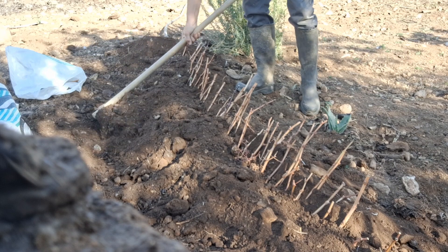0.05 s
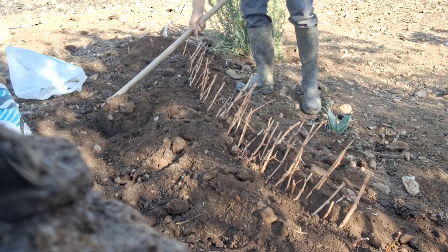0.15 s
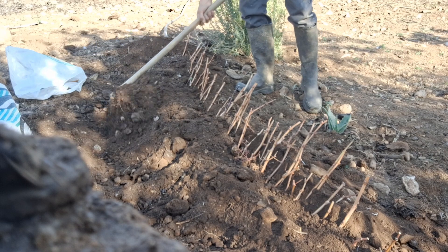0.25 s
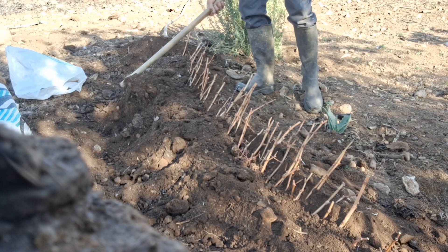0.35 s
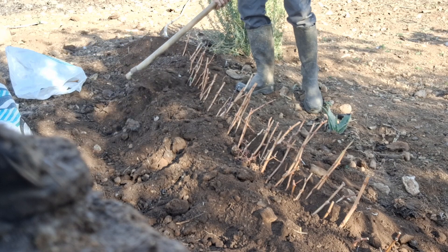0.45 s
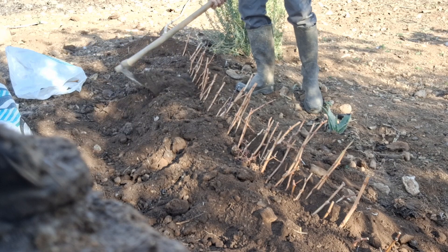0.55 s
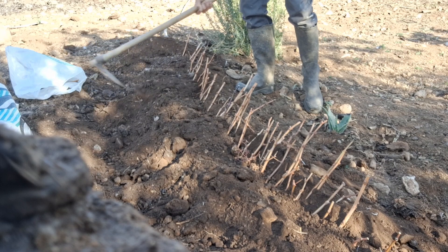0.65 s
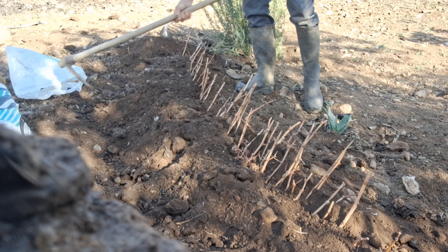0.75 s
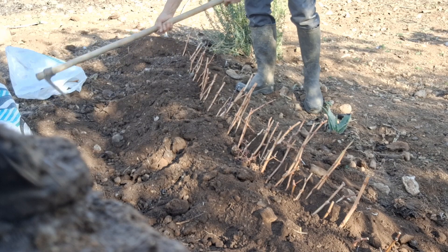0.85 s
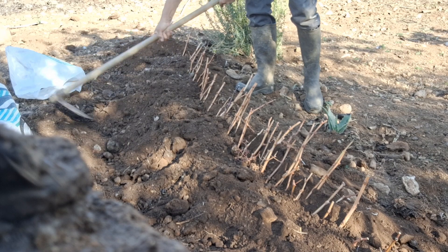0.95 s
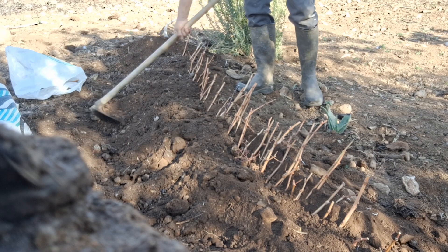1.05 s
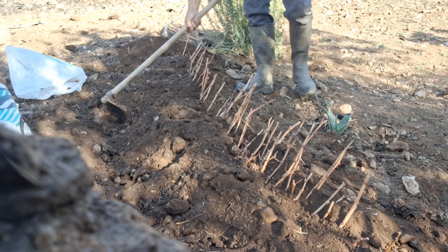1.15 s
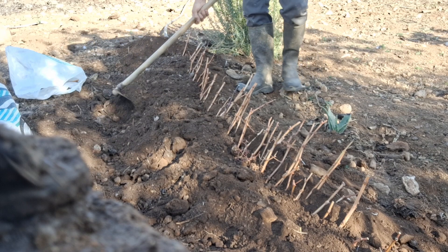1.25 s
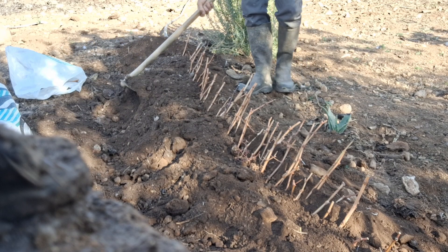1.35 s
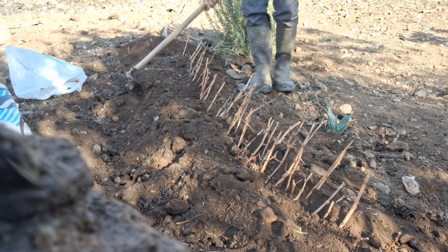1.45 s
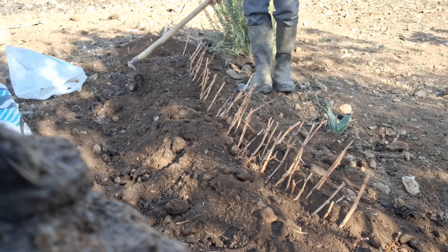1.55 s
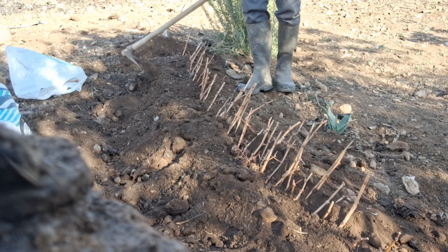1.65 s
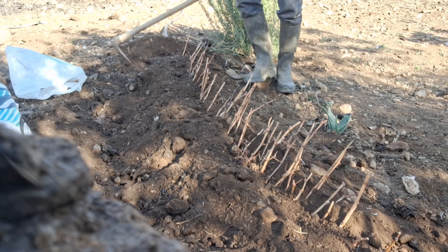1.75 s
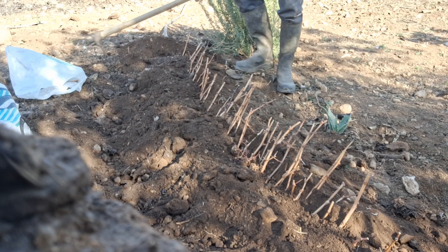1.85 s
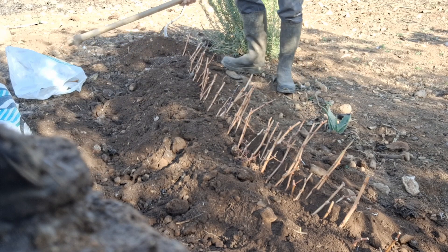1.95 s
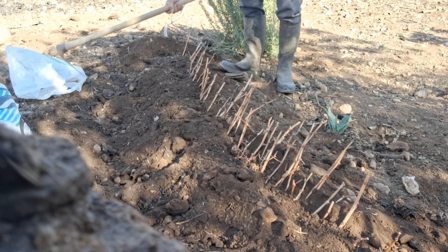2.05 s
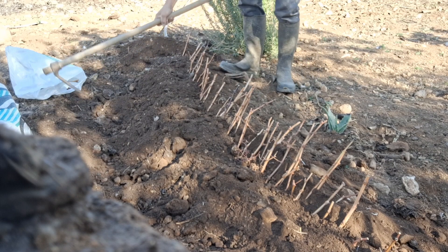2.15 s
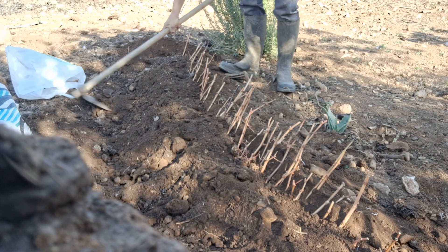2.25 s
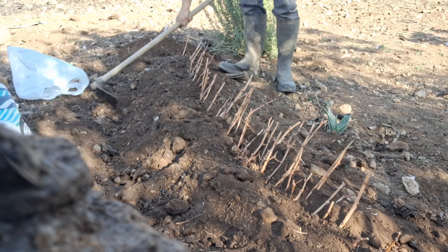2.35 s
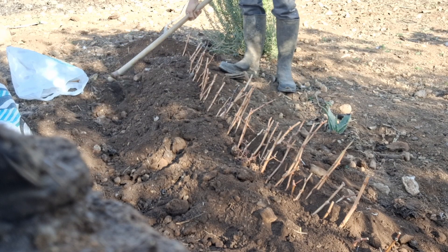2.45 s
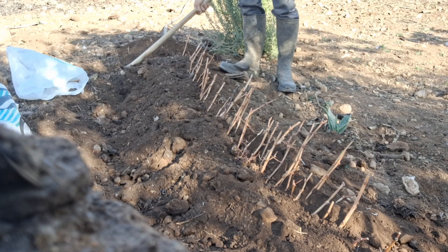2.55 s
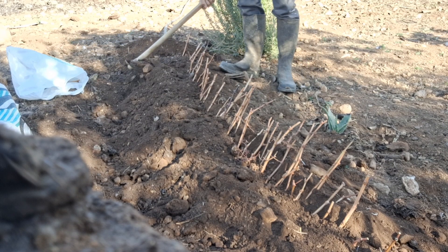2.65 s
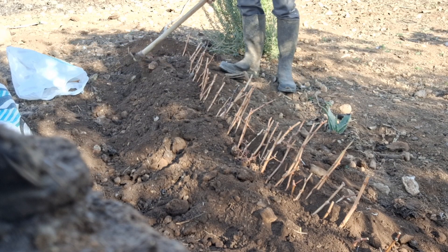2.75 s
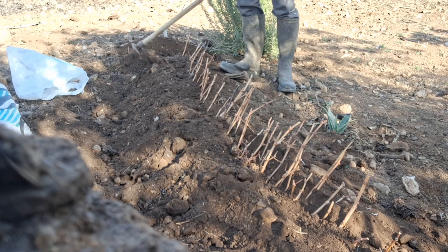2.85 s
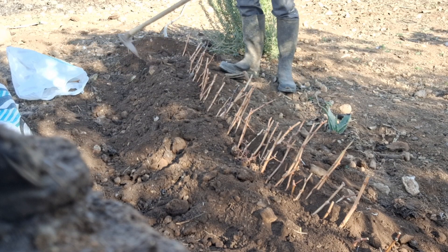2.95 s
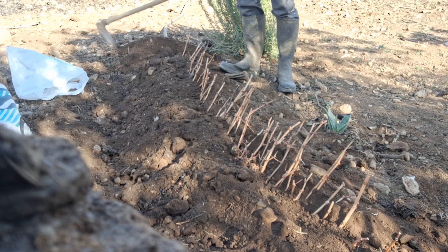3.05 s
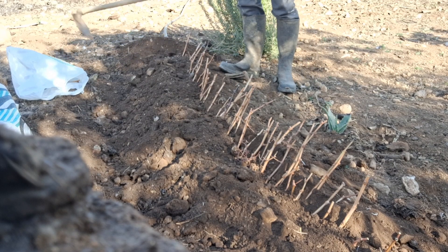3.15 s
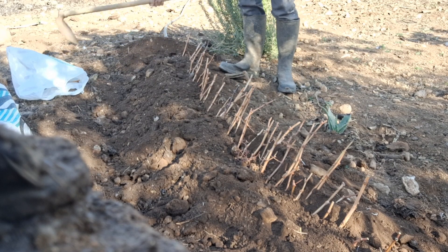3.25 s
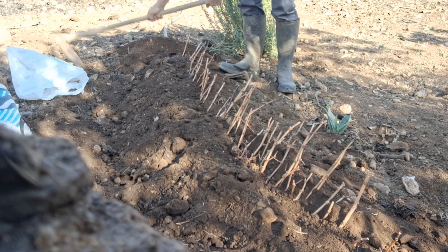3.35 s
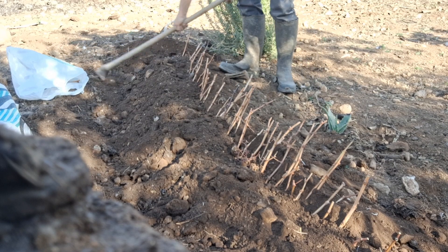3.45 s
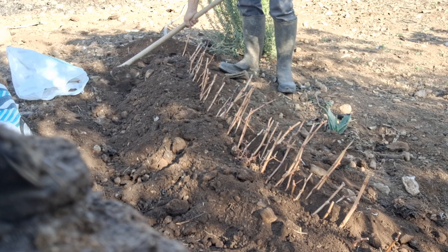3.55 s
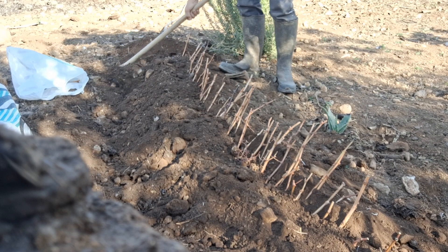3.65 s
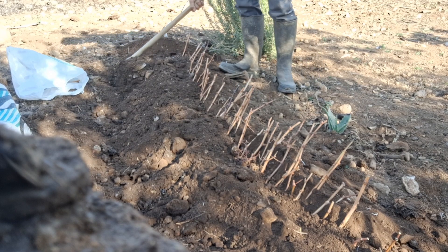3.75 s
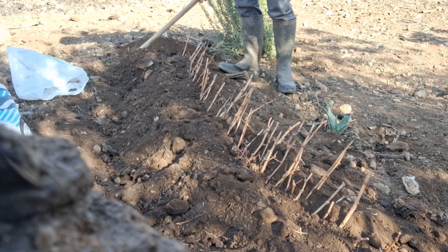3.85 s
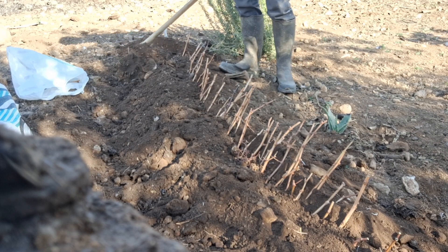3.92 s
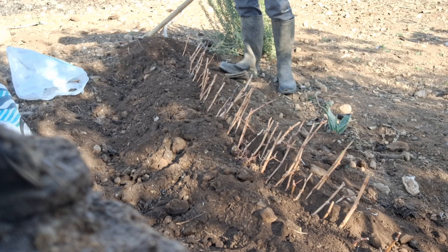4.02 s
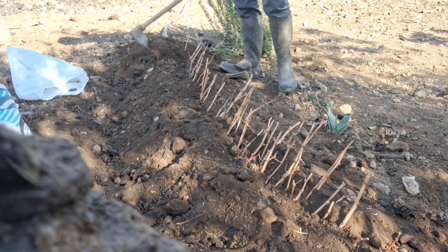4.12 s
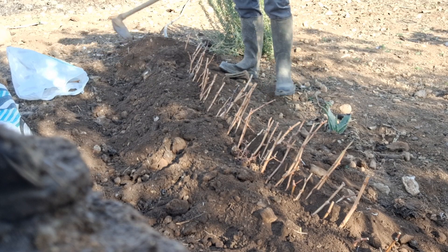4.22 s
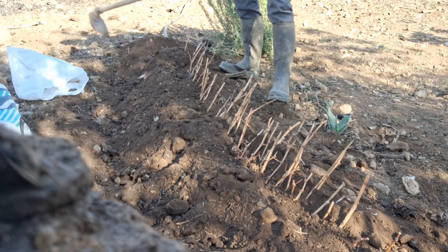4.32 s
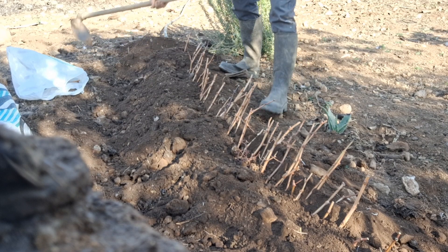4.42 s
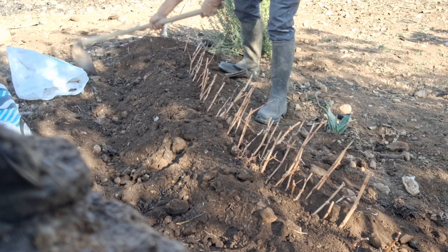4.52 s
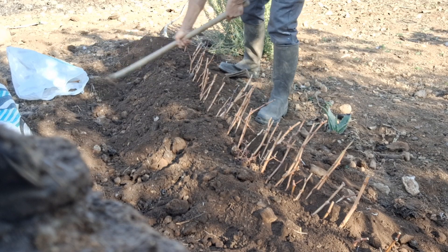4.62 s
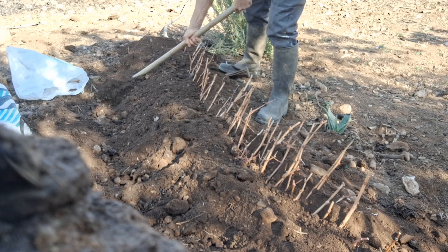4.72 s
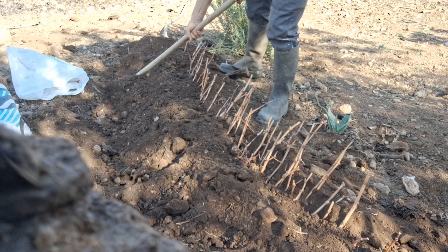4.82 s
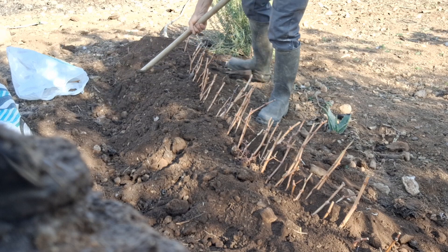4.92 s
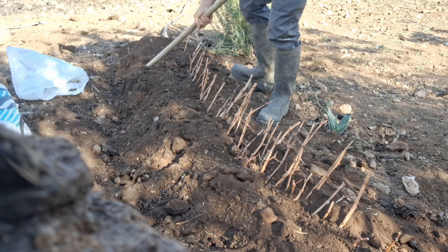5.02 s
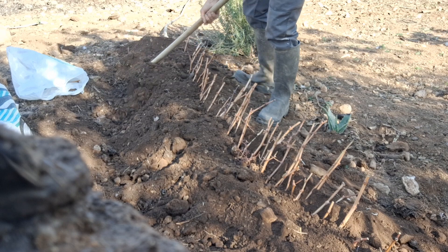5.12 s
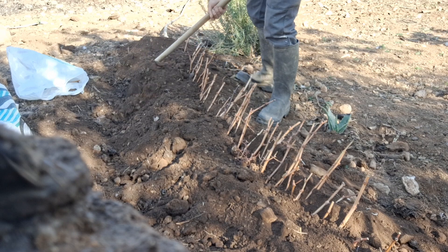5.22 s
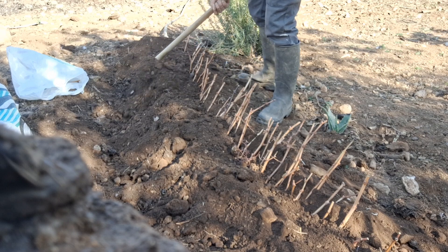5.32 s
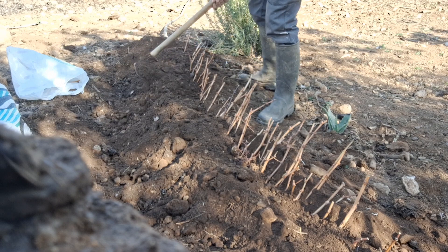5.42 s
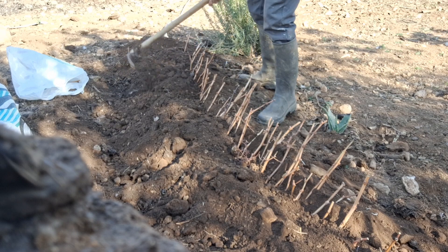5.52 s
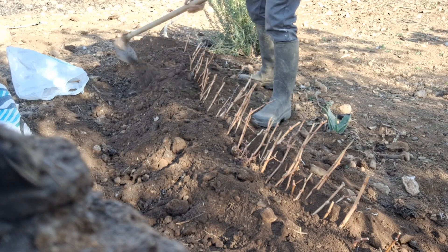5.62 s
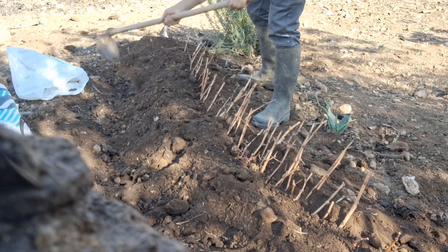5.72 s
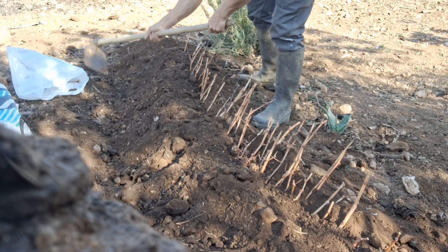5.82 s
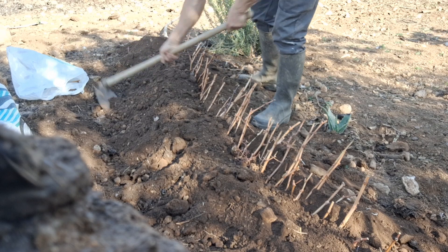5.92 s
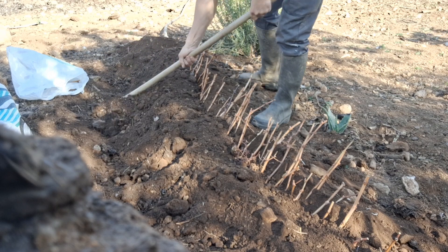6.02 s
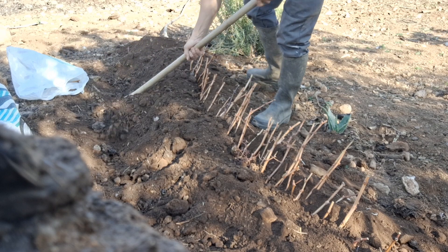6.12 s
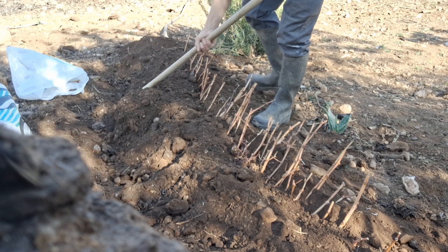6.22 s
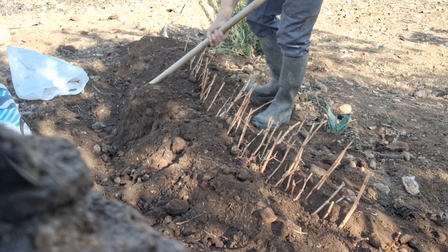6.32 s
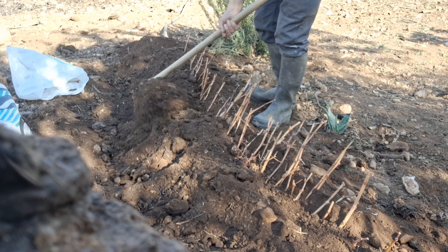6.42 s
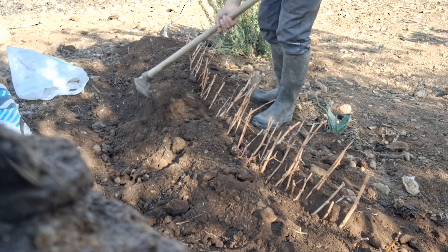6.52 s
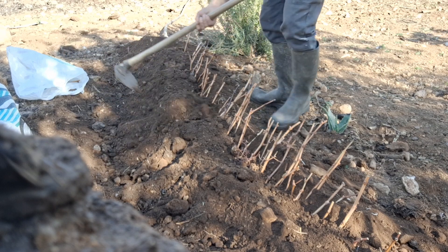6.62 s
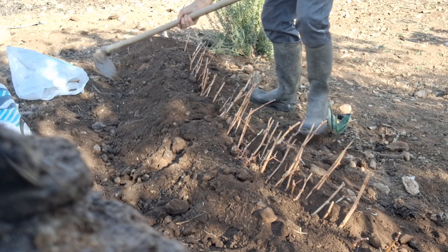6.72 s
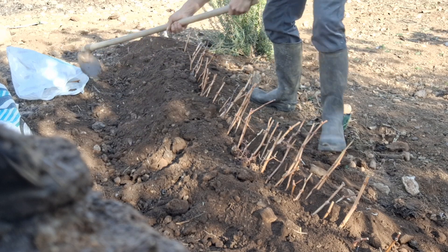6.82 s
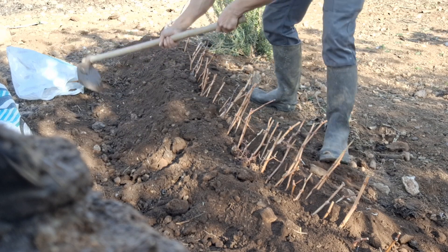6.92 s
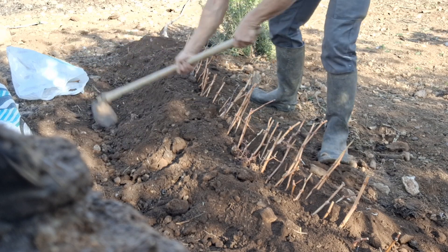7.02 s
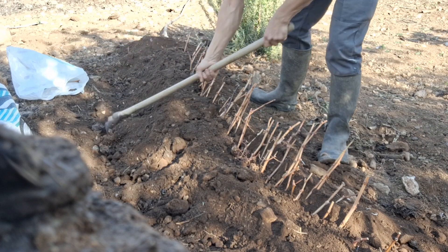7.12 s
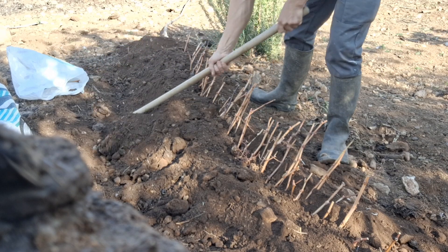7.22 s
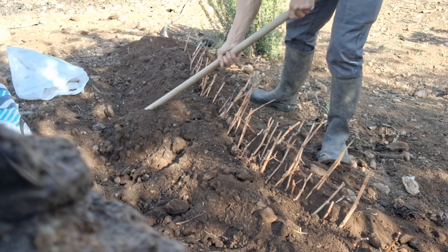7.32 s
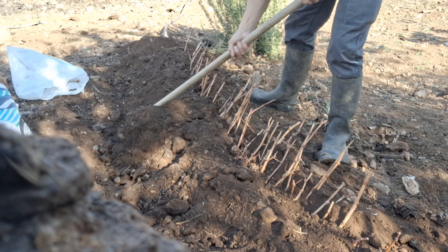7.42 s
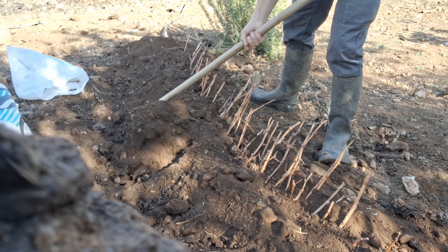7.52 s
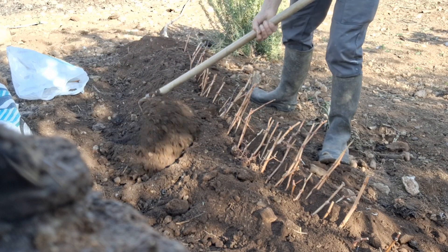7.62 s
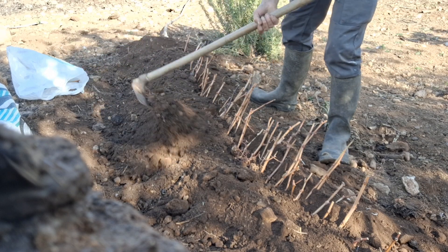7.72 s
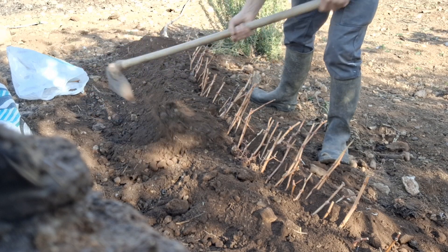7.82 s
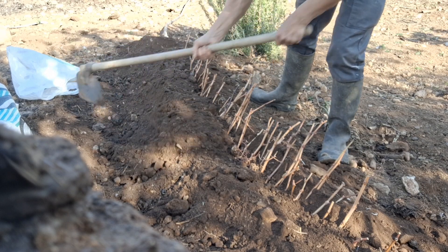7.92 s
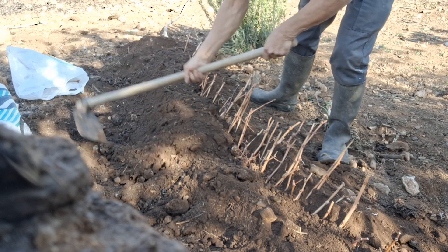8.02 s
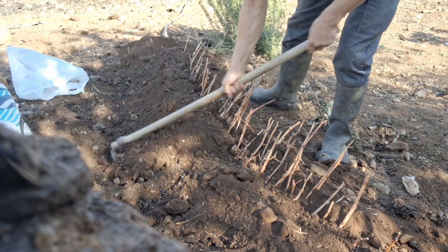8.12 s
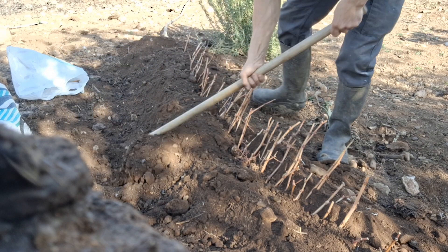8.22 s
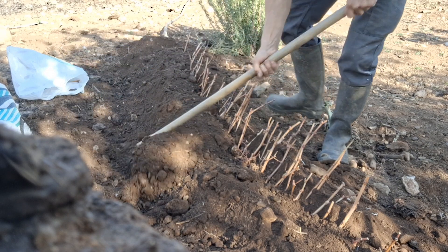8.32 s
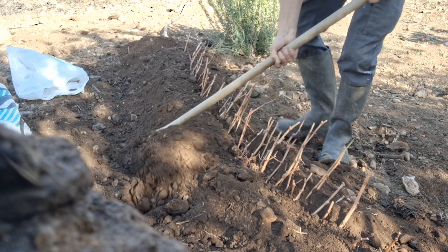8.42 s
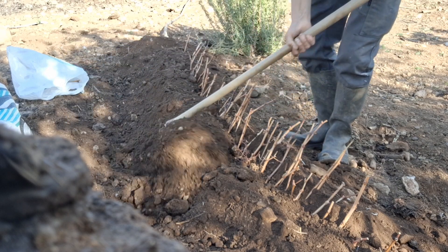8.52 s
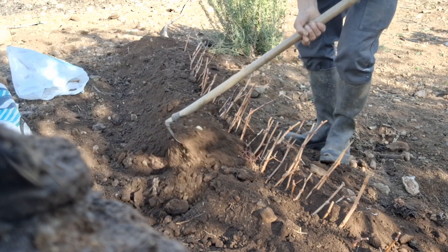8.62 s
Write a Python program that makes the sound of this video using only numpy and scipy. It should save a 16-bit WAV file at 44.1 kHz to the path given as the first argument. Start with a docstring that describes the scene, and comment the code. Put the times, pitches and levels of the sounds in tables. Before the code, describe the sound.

Steady hoeing in an open field: dull thuds, gritty scrapes and stones clacking on steel, with shuffling boots and rustling stalks.

```python
"""In an open field, a hoe chops into dry stony soil about once a second and pulls earth over a trench. Each
stroke is an impact: the ground thuds, grit scrapes along the steel, and stones clack against the blade and
excite its modes. Between strokes clods drop, boots shuffle and dry stalks rustle. Behind the work lie a low
distant rumble, small birds, a far-off rooster and other distant animals."""
import sys
import numpy as np
from scipy import signal
from scipy.fft import rfft, irfft, next_fast_len
from scipy.io import wavfile

SR = 44100
rng = np.random.default_rng(int(sys.argv[2]) if len(sys.argv) > 2 else 0)


def inscribe(sig):
    """Save sig as 16-bit PCM at rate SR to the path in sys.argv[1].

    A 1-D sig is mono; a 2-D sig holds one channel per row.
    Samples are clipped to [-1, 1] before scaling.
    """
    pcm = np.round(np.clip(np.atleast_2d(sig).T, -1, 1) * 32767)
    wavfile.write(sys.argv[1], SR, pcm.astype(np.int16))


N = 382347
SHORT = 8192  # samples in a brief event
TIME = np.arange(N) / SR

# spectra of open air, dry leaves, sliding earth, ground, grit and stone on steel: (f/Hz, level/dB)
AIR_SPECTRUM = [(20, -30), (35, -10), (58, 4), (125, -6), (250, -26), (450, -34), (4000, -41),
                (7200, -37.5), (8600, -45), (16000, -45)]
LEAF_SPECTRUM = [(1400, -14), (3500, -4), (7000, 8.5), (8700, -7.5), (16000, -4)]
SCUFF_SPECTRUM = [(80, -16.5), (250, 5.5), (1300, -2), (3000, -9), (7000, -11.5), (16000, -65)]
THUD_SPECTRUM = [(25, -19.5), (55, -3), (110, 4), (200, -4), (400, -12.5), (2000, -43)]
GRIT_SPECTRUM = [(100, -11.5), (450, -3.5), (950, -1.5), (3200, -3.5), (5000, 1), (7000, -1.5),
                 (8500, -19.5), (16000, -21)]
CLACK_SPECTRUM = [(100, -14), (700, -11.5), (1100, -3.5), (5000, -0.5), (7000, -3.5), (8500, -21.5),
                  (16000, -25.5)]
# spectrum of a soft lump landing: (multiple of its pitch, level/dB)
LUMP_SPECTRUM = [(.3, -4), (1, 0), (2, -8), (3.5, -25), (12, -44)]
# far-off animal calls: (t/s, duration/s, starting f/Hz, level/dB)
ANIMAL_CALLS = [(.53, .42, 1940, -73), (1.266, 0.22, 3030, -68), (4.058, 0.16, 1950, -67),
                (4.09, 0.1, 800, -59), (6.59, 0.26, 2010, -68), (7.52, 0.18, 1930, -70)]
# falling bird chirps: (t/s, starting f/Hz, level/dB)
CHIRPS = [(.06, 4900, -71), (.17, 4300, -68), (.33, 3900, -73), (.77, 4400, -66), (2.03, 4200, -71),
          (3.15, 4100, -69)]
# the rooster's two notes: (t/s, duration/s, level/dB)
CROW_NOTES = [(2.68, .3, -71.5), (3.14, 1.02, -72.5)]
# stalks brushed by the legs, earth sliding, thrown earth pattering down: (t/s, duration/s, level/dB)
RUSTLES = [(1.32, 0.47, -63), (1.56, 0.74, -55.5), (2.69, 0.14, -56.5), (3.34, 0.23, -58.5),
           (4.08, .13, -64.5), (4.22, 0.1, -53.5), (5.0, 0.13, -60), (5.5, 0.25, -62), (6.72, 0.3, -62.5)]
SLIDES = [(0, 0.31, -58), (3.78, 0.6, -69), (4.94, 0.22, -62.5), (5.51, 0.15, -58.5), (8.48, 0.14, -57)]
PATTERS = [(1.35, .11, -57), (5.14, .36, -60), (6.26, 0.56, -63), (8.26, 0.12, -57.5)]
# clods landing and boots treading; pebbles and twigs ticking: (t/s, peak level/dB, f/Hz)
CLOD_FALLS = [(0.012, -40, 825), (1.335, -40, 297), (1.844, -47, 520), (2.014, -45, 201),
              (2.059, -43.5, 261), (4.505, -38.5, 339), (4.97, -45.5, 300), (6.187, -47, 200),
              (6.291, -42, 259.6), (6.337, -45, 231), (6.902, -44, 171), (6.957, -42.5, 387),
              (7.092, -28.5, 433), (8.505, -40, 241)]
PEBBLE_TICKS = [(.137, -41, 1170), (0.4439, -38, 4810), (.921, -47, 4900), (3.174, -43, 7300),
                (4.797, -29, 5400), (4.803, -29, 5400), (5.3837, -29, 6700), (5.385, -40, 1800),
                (6.143, -43, 2100)]
# modes of the steel blade, damped by earth: (f/Hz, level/dB)
BLADE_MODES = [(930, -5), (1130, -6), (1580, -5), (1953, 4), (2599, -4), (3114, 1), (4583, -2), (4958, -3),
               (6500, -4)]
# stones hitting the blade: (t/s, level/dB, knock f/Hz, chatter T60/s, relative rebound level/dB)
STONE_HITS = [(1.0679, -24, 2100, 0.019, -17), (1.2452, -34, 3120, 0.028, -14),
              (2.2937, -12.5, 5600, 0.02, -23.5), (2.483, -40, 3400, 0.081, -11),
              (3.429, -13, 2740, 0.047, 0.5), (3.5054, -21.5, 4540, .042, -22),
              (4.62, -20, 1829, 0.037, -5.5), (4.6469, -17, 2960, .013, -16),
              (4.676, -28.5, 1970, 0.051, -7), (4.7227, -39.5, 1040, 0.045, -23.5),
              (5.966, -27, 1088, .045, 1.5), (6.001, -20.5, 1490, 0.029, -32),
              (6.029, -29.5, 2870, 0.021, -6), (7.067, -23.5, 4350, 0.028, -10.5),
              (7.0905, -16, 1343, 0.034, -17.5), (7.1135, -17, 1373, 0.011, -32.5),
              (7.163, -28.5, 1760, 0.025, -11.5), (7.216, -24, 1996, 0.012, -20),
              (7.26, -42, 2650, 0.016, -36), (8.0804, -39, 4080, 0.028, -15.5),
              (8.112, -28, 4560, 0.066, -2.5), (8.1815, -24.5, 2598, 0.023, -22),
              (8.19, -37, 2560, 0.02, -1), (8.265, -48.5, 2485, 0.027, -31)]
# tugs that drag the buried blade back: (t/s, grit level/dB)
BLADE_TUGS = [(1.248, -51), (2.396, -49), (2.477, -51), (7.157, -43)]
# chops: (t/s, grit level/dB, sinking time/s, treble tilt/dB, thud level/dB, prior grazing time/s)
HOE_STROKES = [(1.0679, -38.5, 0.018, -4.5, -42, .032), (2.296, -35.5, 0.015, 4, -39.5, 0.024),
               (3.431, -34, 0.037, 6, -44, 0.0041), (4.608, -42, 0.022, 7, -36, 0.0043),
               (5.965, -39.5, 0.01656, -8.5, -43, 0.0064), (7.068, -43, 0.031, 7, -41.5, 0.0035),
               (8.081, -37.5, 0.053, 1.5, -43.5, 0.00121)]
# right microphone against the left: (f/Hz, level/dB) and (f/Hz, phase lead/rad)
RIGHT_SHADOW = [(250, -3), (2500, -5), (4300, -9.5), (5600, -8), (6800, -15), (9000, -7), (15000, -8)]
RIGHT_LEAD = [(1200, -.35), (3000, -.9), (4200, -2.3), (6000, -2.7), (8300, -4.7), (12000, -5.2)]

RING_DB = -9  # blade ringing against the force that drives it


def undb(db):
    """Amplitude ratio of a level in decibels."""
    return 10 ** (np.asarray(db) / 20)


def unit(x):
    """Normalisation to rms 1."""
    return x / np.sqrt(np.mean(x ** 2))


def over_hz(points, hz):
    """Interpolation on a logarithmic frequency axis."""
    f, value = np.transpose(points)
    return np.interp(np.log(hz + 1), np.log(f), value)


def colour(x, points, tilt_db=0, size=2048):
    """Minimum-phase filtering at unit power gain; the tilt lifts the treble against the mids."""
    hz = np.fft.rfftfreq(size, 1 / SR)
    db = over_hz(points, hz) + tilt_db * over_hz([(1500, 0), (5500, 1)], hz)
    cepstrum = irfft(np.log(undb(db)))
    cepstrum[1:size // 2] *= 2
    cepstrum[size // 2 + 1:] = 0
    response = irfft(np.exp(rfft(cepstrum)))
    return signal.oaconvolve(x, response / np.linalg.norm(response))[:len(x)]


def rolloff(x, hz, kind):
    """First-order low-pass or high-pass filtering."""
    return signal.sosfilt(signal.butter(1, hz, kind, fs=SR, output="sos"), x)


def resonate(x, hz, q):
    """Forced response of a damped resonator."""
    return signal.lfilter(*signal.iirpeak(hz, q, fs=SR), x)


def tone(hz):
    """A sinusoid whose phase is the integral of its frequency."""
    return np.sin(2 * np.pi * np.cumsum(hz) / SR)


def add(track, s, x):
    """Superposition of x on the track from time s."""
    i = max(int(s * SR), 0)
    track[..., i:i + x.shape[-1]] += x[..., :max(N - i, 0)]


def walk(rate, size=N):
    """Random modulation: straight lines between `rate` Gaussian values a second."""
    knots = rng.standard_normal(int(size / SR * rate) + 2)
    return np.interp(np.arange(size) / SR * rate, np.arange(len(knots)), knots)


def grains(rate, spread_db, size=N):
    """Shot noise: `rate` impulses a second, most small and a few large; rms 1."""
    out = np.zeros(size)
    place, strength, sign = rng.random((int(rate * size / SR) + 1, 3)).T
    db = -spread_db * np.log(np.maximum(strength, .003))
    out[(place * size).astype(int)] = undb(db) * np.sign(sign - .5)
    return unit(out)


def fade(t, t60):
    """Exponential decay from t = 0, by 60 dB in t60 seconds."""
    return np.exp(-np.log(1000) * np.maximum(t, 0) / max(t60, .001))


def swells(rows, rise=.12):
    """Triangular envelopes: each movement builds quickly and then runs out."""
    return sum(undb(db) * np.interp(TIME, [s, s + rise * length, s + length], [0, 1, 0])
               for s, length, db in rows)


def scatter(x, t60, size=30000):
    """Diffuse reflection: decaying random echoes, different on each side."""
    echoes = rng.standard_normal((2, size)) * fade(TIME[:size], t60)
    return signal.oaconvolve(x[None], echoes / np.linalg.norm(echoes[0]), axes=1)[:, :N]


def tree_echo(x):
    """Reverberation: the trees return a faint tail, weak in the bass."""
    return x + undb(-28) * scatter(rolloff(x[0], 900, "high"), t60=.45)


def ground_echo(x, left_db=-18, right_db=-4):
    """Early reflection: rough ground scatters the treble, most strongly to the right."""
    echoes = scatter(rolloff(x, 2500, "high"), t60=.01, size=512)[:, :len(x)]
    return x + undb([[left_db], [right_db]]) * echoes


def air(draught_db=-10):
    """Ambient noise: the rumble is coherent at both microphones, the draught and hiss incoherent."""
    shared = colour(rng.standard_normal(N), AIR_SPECTRUM, size=SHORT) * undb(2 * walk(6))
    own = np.array([colour(rng.standard_normal(N), AIR_SPECTRUM, size=SHORT) for _ in range(2)])
    rumble = rolloff(shared + undb(draught_db) * own, 700, "low")
    return undb(-57) * (rumble + rolloff(own, 700, "high"))


def far_animals(fall=.05, hoarse_hz=85):
    """Thin calls swell and sink in pitch; random frequency modulation makes them hoarse."""
    out = np.zeros(N)
    for s, length, top_hz, db in ANIMAL_CALLS:
        progress = TIME[:int(length * SR)] / length
        hz = top_hz * (1 - fall * progress) + hoarse_hz * walk(400, len(progress))
        add(out, s, undb(db) * np.sin(np.pi * progress) * tone(hz))
    return out


def rooster(start_hz=840, sag_hz=70, sag_s=.2, waver=.055):
    """Frequency modulation: each note of the crow wavers and sags exponentially."""
    out = np.zeros(N)
    for s, length, db in CROW_NOTES:
        t = TIME[:int(length * SR)]
        hz = start_hz - sag_hz * (1 - np.exp(-t / sag_s))
        hz *= 1 + waver * walk(170, len(t))
        add(out, s, undb(db) * signal.windows.tukey(len(t), .3) * tone(hz))
    return out


def birds(chirp_s=.11, fall_hz_per_s=10000, hoarse=.085):
    """Each chirp is a falling frequency sweep, broken up by amplitude modulation."""
    out, n = np.zeros(N), int(chirp_s * SR)
    for s, start_hz, db in CHIRPS:
        hz = (start_hz - fall_hz_per_s * TIME[:n]) * (1 + hoarse * walk(1500, n))
        envelope = np.hanning(n) ** .5 * undb(6 * walk(70, n))
        add(out, s, undb(db) * unit(tone(hz) * envelope))
    return out


def stalks():
    """Shot noise of dry stalks brushed by the legs; leaves stir faintly in between."""
    crackle = grains(4500, 3.6) * unit(undb(3.5 * walk(45)))
    stir = undb(-80 + 4 * walk(7))
    return colour(crackle, LEAF_SPECTRUM) * (swells(RUSTLES) + stir)


def crumbs(rate, spread_db, drift_db, size=N, count=12):
    """Brittle fracture: each size of crumb pings at its own resonance, in a shifting mix; rms 1."""
    out = 0
    for hz in np.geomspace(250, 13000, count) * (1 + .1 * rng.uniform(-1, 1, count)):
        clicks = grains(rate / count, spread_db, size) * undb(drift_db * walk(50, size))
        out = out + np.sqrt(hz) * unit(resonate(clicks, hz, q=3))
    return unit(out)


def loose_earth(delay_s=.02, trickle_s=.28, trickle_db=-28):
    """Granular flow: earth slides over the trench and underfoot; crumbs leave the blade after a chop."""
    crumble = crumbs(5000, 3, 3, count=7) * unit(undb(2 * walk(40)))
    slide = colour(crumble, SCUFF_SPECTRUM) * swells(SLIDES, rise=.15)
    trickles = [(s + delay_s, trickle_s, db + trickle_db) for s, db, *_ in HOE_STROKES]
    return slide + colour(crumbs(1600, 3, 2), GRIT_SPECTRUM) * swells(trickles)


def lumps(force, hz):
    """Heavy damping: soft earth turns each impact into a dull, broad thump around its pitch."""
    return colour(force, np.array(LUMP_SPECTRUM) * [hz, 1])


def clod(hz):
    """Inelastic impact: a clod thumps down and falls apart into smaller lumps; peak 1."""
    force = grains(900, 3, SHORT) * fade(TIME[:SHORT], .15)
    force[0] = 28  # the landing blow
    thump = lumps(force + 2 * resonate(force, hz, q=2), hz)
    return thump / np.abs(thump).max()


def tick(hz, q=2.5):
    """A brief crumbling contact excites one broad resonance of a pebble or twig; peak 1."""
    force = rng.standard_normal(SHORT) * fade(TIME[:SHORT], .016)
    body = resonate(resonate(force, hz, q), hz, q)
    return body / np.abs(body).max()


def debris():
    """Superposed small impacts: pattering earth, soft clods and footfalls, hard ticks."""
    impacts = grains(260, 4) * unit(undb(4 * walk(16)))
    out = lumps(impacts, hz=330) * swells(PATTERS, rise=.3)
    for s, db, hz in CLOD_FALLS:
        add(out, s, undb(db) * clod(hz))
    for s, db, hz in PEBBLE_TICKS:
        add(out, s, undb(db) * tick(hz))
    return out


def blade(force, detune=.02, spread_db=4):
    """Modal ringing of the steel; contact point and clinging earth alter the modes every time."""
    t, ring = TIME[:SHORT], 0
    for hz, db in BLADE_MODES:
        gain = undb(db + spread_db * rng.normal())
        mode_hz = hz * (1 + detune * rng.uniform(-1, 1))
        ring += gain * np.sin(2 * np.pi * (mode_hz * t + rng.random()))
    ring *= fade(t, .045)
    return signal.oaconvolve(force, ring / np.linalg.norm(ring))[:len(force)]


def stone(hz, tilt_db, t60, knock_db):
    """Hard impact: a stone cracks and chatters on the steel, exciting its own knock and the blade."""
    t = TIME[:SHORT]
    force = rng.standard_normal(SHORT) * fade(t, t60)
    force[0] = 3.7  # the first crack
    knock = undb(knock_db) * resonate(force, hz, q=3.2)
    clack = colour(force + knock + undb(RING_DB) * blade(force), CLACK_SPECTRUM, tilt_db)
    attack = clack[t < .004]
    return ground_echo(clack / np.sqrt(np.mean(attack ** 2)))


def stones(rebound_s=.015, rebound_pitch=.93):
    """Each stone strikes and rebounds; small ones are brighter, and soil absorbs the treble."""
    out = np.zeros((2, N))
    for s, db, hz, t60, rebound_db in STONE_HITS:
        sunk_s = min(abs(s - stroke[0]) for stroke in HOE_STROKES)
        tilt_db = -3 + 6.5 * np.log2(hz / 2000) - 50.5 * sunk_s
        knock_db = 1.5 + 79.5 * sunk_s  # the knock stands out as the blade comes free
        add(out, s, undb(db) * stone(hz, tilt_db, t60, knock_db))
        rebound = stone(hz * rebound_pitch, tilt_db, t60, knock_db)
        add(out, s + rebound_s, undb(db + rebound_db) * rebound)
    return out


def dig(db, length, t60, tilt_db, thud_db, graze_s=0, graze_db=-8, size=20000):
    """Friction and impact: the edge bites the crust, grit grinds along the blade, the ground thuds."""
    t = TIME[:size] - graze_s
    bite = np.where(t < 0, undb(graze_db), 1 + .85 * fade(t, .13))
    force = crumbs(5000, 5, 4, size) * bite * fade(t - length, t60)  # dies once the blade stops
    scrape = colour(force + undb(RING_DB) * blade(force), GRIT_SPECTRUM, tilt_db)
    onset = 1 - np.exp(-np.maximum(t, 0) / .008)
    thud = colour(rng.standard_normal(size), THUD_SPECTRUM) * onset * fade(t - length, .35)
    blow = thud[(t >= 0) & (t < 2 * length)]
    return undb(db) * ground_echo(scrape) + undb(thud_db) * thud / np.sqrt(np.mean(blow ** 2))


def hoe(settle_t60=.29):
    """The momentum of the swing drives the blade in; after some chops it is tugged back."""
    out = np.zeros((2, N))
    for s, db, length, tilt_db, thud_db, graze_s in HOE_STROKES:
        add(out, s - graze_s, dig(db, length, settle_t60, tilt_db, thud_db, graze_s))
    for s, db in BLADE_TUGS:
        add(out, s, dig(db, length=.018, t60=.12, tilt_db=-4, thud_db=db - 14))
    return out


def scene():
    """Direct and diffuse sound: the work is close by, the animals are blurred by distance."""
    distant = scatter(birds() + rooster() + far_animals(), t60=.12)
    work = stones() + hoe() + debris() + loose_earth() + stalks()
    return air() + distant + tree_echo(work)


def record(dry, top_hz=16000):
    """Acoustic shadow: the housing shades the right microphone; both sides lose the top treble."""
    size = next_fast_len(N + 1024)
    hz = np.fft.rfftfreq(size, 1 / SR)
    shadow = undb(over_hz(RIGHT_SHADOW, hz)) * np.exp(1j * over_hz(RIGHT_LEAD, hz))
    right = irfft(rfft(dry[1], size) * shadow, size)[:N]
    lowpass = signal.ellip(10, .2, 70, top_hz, fs=SR, output="sos")
    return signal.sosfilt(lowpass, np.array([dry[0], right]))


dry = scene()
out = record(dry)
inscribe(out)
```